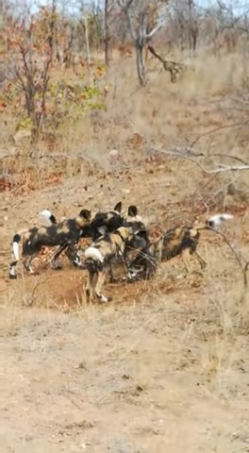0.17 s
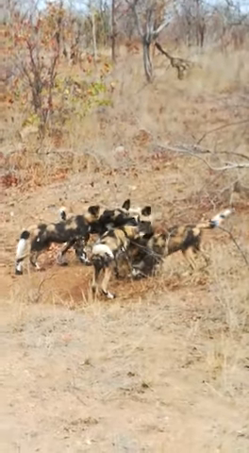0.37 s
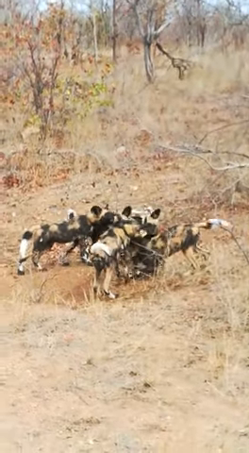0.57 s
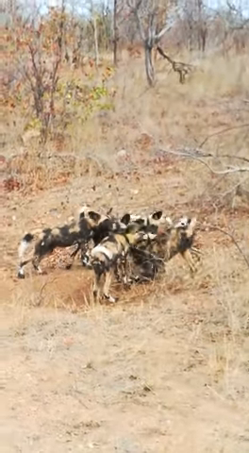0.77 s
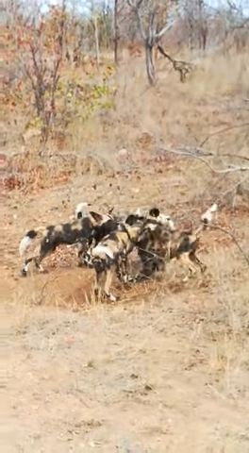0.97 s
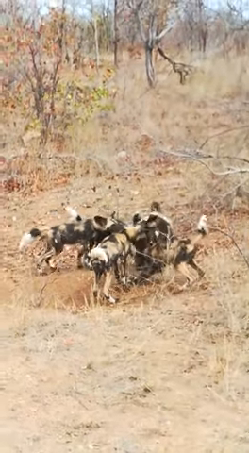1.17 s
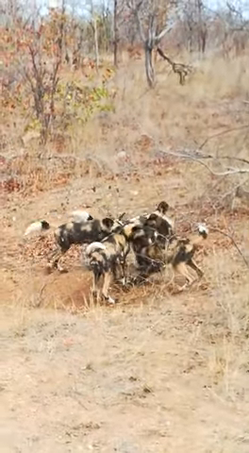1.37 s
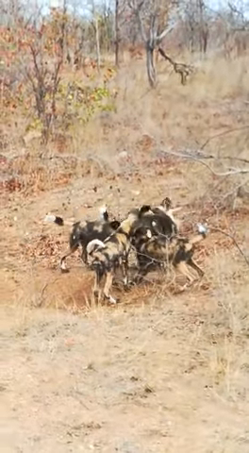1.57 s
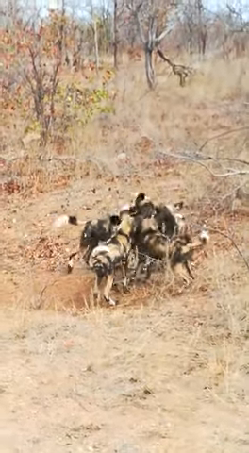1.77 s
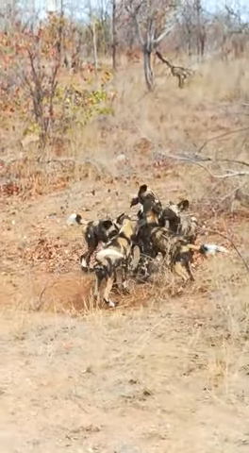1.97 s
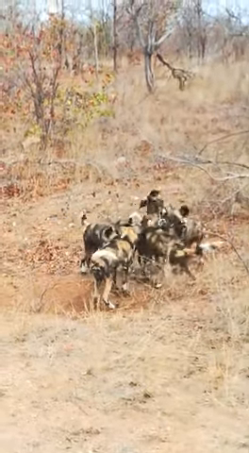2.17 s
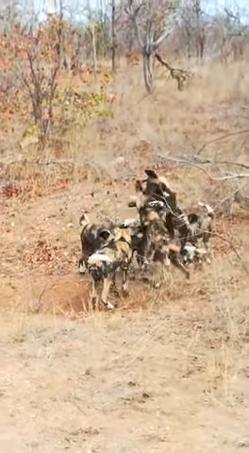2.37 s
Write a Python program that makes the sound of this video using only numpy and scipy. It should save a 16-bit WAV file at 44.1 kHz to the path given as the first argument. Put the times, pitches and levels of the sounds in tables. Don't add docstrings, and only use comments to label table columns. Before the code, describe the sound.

A pack of wild dogs twitters in short, piercing, birdlike chirps that swoop and waver, with brief soft whimpers and faint paw scuffs, in open dry scrub, while light wind thumps dully on a handheld phone's microphones.

```python
import sys
import numpy as np
from scipy import signal
from scipy.fft import rfft, irfft, next_fast_len
from scipy.io import wavfile
from scipy.ndimage import uniform_filter1d, map_coordinates

SR = 44100
rng = np.random.default_rng(int(sys.argv[2]) if len(sys.argv) > 2 else 0)


def level_to_linear(level):
    exponent = np.asarray(level, float) / 20
    return 10 ** exponent


def generate_wav(signal):
    frames = np.transpose(np.atleast_2d(signal))
    scaled = np.clip(frames, -1, 1) * 32767
    pcm = np.round(scaled).astype(np.int16)
    wavfile.write(sys.argv[1], SR, pcm)


N = 105840

# time_s, pitch_hz
T1 = [-68, -55, -65, -46.5, -54], [(.044, 6960), (.063, 7050), (.084, 6430), (.096, 6960), (.105, 7800)]
T2 = [-67, -54, -52, -45, -57, -55, -50], [(.183, 7830), (.2, 8360), (.245, 8260), (.287, 8910),
      (.318, 8500), (.345, 7490), (.372, 5970), (.392, 6930)]
T3 = [-49.5, -48.5, -61, -61, -48.5], [(.253, 7110), (.272, 7000), (.29, 6440), (.308, 5740), (.336, 7300)]
T4 = [-72.5, -60.5, -56.5, -57, -60.5], [(.51, 7600), (.545, 7430), (.58, 6200), (.6, 5450), (.613, 5880),
      (.622, 7000)]
T5 = [-55.5, -55.5, -62, -59, -66.5, -56.5, -51.5], [(.641, 8980), (.67, 9190), (.685, 10240),
      (.704, 11540), (.73, 10900), (.762, 10060), (.787, 7140), (.803, 5870), (.83, 7100)]
T6 = [-58, -63, -66.5], [(.815, 7660), (.835, 6890), (.852, 6050)]
T7 = [-58, -60, -65, -55, -69, -66], [(1.02, 14000), (1.036, 15200), (1.056, 13200), (1.072, 11700),
      (1.088, 10900), (1.105, 11500), (1.14, 11800)]
T8 = [-70, -64, -76, -64, -75, -61, -65], [(1.155, 11900), (1.187, 12160), (1.22, 10440), (1.238, 11800),
      (1.25, 11970), (1.262, 9300), (1.277, 6165), (1.303, 6320)]
T9 = [-61, -57, -65.5, -60.5], [(1.12, 7600), (1.15, 7350), (1.18, 6500), (1.205, 6110)]
T10 = [-63, -58.5], [(1.436, 7530), (1.447, 9030)]
T11 = [-67.5, -49, -51.5, -61, -57.5], [(1.537, 8580), (1.546, 8280), (1.551, 7600), (1.561, 7070),
       (1.575, 6910), (1.581, 6210), (1.594, 6710)]
T12 = [-61, -64.5, -67, -59, -55.5], [(1.69, 8020), (1.73, 7660), (1.742, 6900), (1.753, 8000)]
T13 = [-57, -47.5, -51.5, -48, -47.5, -59.5], [(1.808, 8670), (1.817, 8200), (1.823, 7600), (1.85, 7170),
       (1.866, 6900), (1.871, 6314), (1.889, 6430)]
T14 = [-76, -64.5, -53.5, -59], [(1.982, 6900), (1.997, 7570), (2.05, 7110), (2.057, 6460), (2.075, 6620)]
T15 = [-57, -45.5, -54.5, -54.5, -52], [(2.128, 7950), (2.143, 6960), (2.165, 6620), (2.171, 7170),
       (2.178, 6370), (2.195, 6410)]
T16 = [-57, -54.5, -60.5, -52, -62.5], [(2.278, 7650), (2.31, 6890), (2.35, 6374), (2.39, 6287),
       (2.405, 6350)]
T17 = [-63, -56], [(2.32, 6870), (2.352, 7500)]
T18 = [-57, -72], [(2.055, 8000), (2.07, 8300), (2.081, 9030)]
T19 = [-59, -58], [(1.746, 8500), (1.76, 8700)]
# (time_s, pitch_hz)
TWITTERS = [T1, T2, T3, T4, T5, T6, T7, T8, T9, T10, T11, T12, T13, T14, T15, T16, T17, T18, T19]
# frequency_hz, gain_db
THROAT = [(5600, -3.5), (6300, 13.5), (7600, 4), (8800, 6.5), (10200, -20.5), (11500, -3.5), (13000, -35),
          (15000, -7)]
# whimper_multiple, level_db
SIDEBANDS = [(-1, -19), (1, -6), (2, -22)]
# start_s, length_s, first_hz, middle_hz, last_hz, level_db
WHIMPERS = [
    (0.34, 0.082, 520, 469, 398, -74),
    (0.335, 0.022, 984, 985, 980, -70.5),
    (0.763, 0.025, 1060, 1002, 950, -70),
    (1.481, 0.024, 1048, 1015, 1030, -58),
    (1.505, .024, 1280, 1270, 1260, -65),
    (1.528, 0.039, 1260, 1203, 1000, -76),
    (1.778, 0.081, 891, 985, 894, -70),
    (2.102, 0.068, 897, 873, 800, -57.5),
    (2.31, 0.063, 736, 590, 469, -65.5),
]
# frequency_hz, gain_db
MUZZLE = [(1400, -30), (1800, -4.5), (2070, -4.5), (2750, -7.5), (3650, -6.5), (4400, -6.5), (5300, 0),
          (6200, 2.5)]
# time_s, frequency_hz, gain_db
JAWS = [
    (1.49, 2080, 9.5),
    (1.797, 3720, 24),
    (1.823, 2920, 21),
    (2.128, 3570, 14),
    (2.335, 2500, 13),
    (2.358, 2850, 20),
]
# time_s, length_s, level_db
SCUFFS = [(0.196, 0.0053, -72), (0.89, 0.004, -56), (0.984, 0.18, -65), (1.042, 0.0047, -50.5),
          (1.076, 0.04, -47.5), (1.145, 0.1, -60), (1.242, 0.068, -63), (1.437, 0.01, -69),
          (1.548, 0.0033, -53.5), (1.736, 0.012, -62.5), (1.89, 0.0073, -64), (2.072, 0.049, -52),
          (2.346, 0.11, -58)]
# frequency_hz, density_db (per Hz)
LITTER = [(530, -43), (900, -6.5), (1170, -14), (1950, -7.5), (3140, -4), (8440, 1), (12200, -26),
          (15500, -23)]
# time_s, level_db
MILLING = [
    (0.0, -74.5),
    (.62, -73.5),
    (.72, -64.5),
    (.9, -69),
    (1.72, -74.5),
    (1.82, -62.5),
    (1.9, -76.5),
    (1.96, -80),
    (2.4, -76),
]
# frequency_hz, density_db (per Hz)
STIR = [(3000, -14), (5000, -3), (6500, 3.5), (8500, -4), (10000, -48), (13000, -27)]
# frequency_hz, gain_db
SHADOW = [(60, 0.5), (400, -3.5), (1500, 5), (4400, -17), (6500, -29), (9000, -13.5), (15000, -40)]
# time_s, peak_db, snap_db
THUMPS = [(0.053, -40, -10), (0.109, -51, -9), (0.136, -36.5, 7), (.2, -30.5, -5), (.253, -18.5, -1.5),
          (.278, -19, -5), (0.319, -25.5, -14), (.435, -41.5, 5), (.519, -28.5, -1), (.568, -23.5, 3),
          (.612, -27.5, -11), (.64, -18.5, -0.5), (.687, -24, 2.5), (.759, -25, -5.5), (0.833, -27.5, -6),
          (0.863, -31.5, -3), (.901, -25, -15), (.912, -24, 0), (0.986, -37, -13), (1.038, -32, -21),
          (1.121, -26.5, -15.5), (1.138, -31, -16), (1.164, -38, -14), (1.215, -20.5, -3),
          (1.246, -29.5, -3), (1.263, -30.5, 3), (1.289, -32, -10), (1.338, -25.5, 2.5), (1.369, -24.5, 2),
          (1.379, -27, 3.5), (1.397, -35.5, -2), (1.429, -45, -10), (1.489, -43, -22), (1.565, -32.5, -12),
          (1.637, -25, -13), (1.812, -46, -14), (1.876, -40.5, -18), (1.995, -34.5, 1.5),
          (2.023, -32.5, -16), (2.079, -26, -5), (2.101, -22.5, -7.5)]
# frequency_hz, density_db (per Hz)
RUMBLE = [(8.8, -54), (15, -3), (70, -5), (120, -8.5), (226, -25), (500, -45.5), (650, -106), (1100, -120)]
# frequency_hz, density_db (per Hz)
BUSH = [(250, 2), (600, -4.5), (1000, -2.5), (3000, -4.5), (9000, -8.5), (15700, -18.5)]

WHISTLE_DB, FLUTTER_DB, PULSING_DB, OCTAVE_DB = 4, 2.5, 1.8, -45
WAVER_HZ, GLIDE_S, SPLIT_HZ = 34.9, 0.0058, 930
JAWS_WIDE_HZ, JAWS_S, PATCHY_DB, LATE_SAG = 350, 0.014, 3, 1.6
VOICE_EDGE_S = 0.0073
STIR_DB, BUSH_DB = 2.5, -67
SELF_ALIKE = 0.068
ECHO_DB, FAR_ECHO_DB, ECHO_T60_S, SCATTER, LOW_ECHO = -7, -8.5, 0.095, 1.2, 0.25
CALM_DB, DYING_DB, EDDY_S, STEADY_DB, LUMPS_DB = -44.5, -20, 0.034, -2.5, 4.5
THUMP_HZ, THUMP_T60_S, THUMP_DB, SNAP_DB = 85.2, 0.067, 2.5, -5.5
PASSING_DB, PASSING_HZ, PASSING_T60_S = -37.5, 80, 0.048
LAG_S, WHIMPER_LAG_S, WIND_LAG_S = 0.00068, 0.00036, 0.0011


def unit(x):
    return x / np.sqrt(np.mean(x ** 2) + 1e-20)


def along(points, hz):
    f, v = np.transpose(points)
    return np.interp(np.log(hz + 1), np.log(f + 1), v)


def curves(rows, smooth_s):
    s, *cols = np.transpose(rows)
    t = np.arange(N) / SR
    return [uniform_filter1d(np.interp(t, s, c), int(smooth_s * SR) + 1) for c in cols]


def wobble(rate):
    knots = rng.standard_normal(int(N * rate / SR) + 4)
    return map_coordinates(knots, [np.arange(N) * rate / SR])


def filtered(x, response):
    m = next_fast_len(N + SR // 2)
    return irfft(rfft(x, m) * response(np.fft.rfftfreq(m, 1 / SR)), m)[..., :N]


def noise(spectrum):
    return unit(filtered(rng.standard_normal(N), lambda hz: level_to_linear(along(spectrum, hz))))


def gate(start, end, edge_s):
    t = np.arange(N) / SR
    opening = np.minimum(t - start, end - t) / edge_s + 0.5
    return np.sin(np.pi / 2 * np.clip(opening, 0, 1)) ** 2


def twitters(low_phase, low_on):
    out, t = np.zeros(N), np.arange(N) / SR
    for effort_db, glide in TWITTERS:
        hz, = curves(glide, GLIDE_S)
        start, end = glide[0][0], glide[-1][0]
        phase = 2 * np.pi * np.cumsum(hz + WAVER_HZ * wobble(300)) / SR
        octave = level_to_linear(OCTAVE_DB + 2.6 * wobble(37.0)) * (hz < SR / 5) * np.sin(2 * phase)
        tone = level_to_linear(along(THROAT, hz)) * (np.sin(phase) + octave)
        for multiple, side_db in SIDEBANDS:
            k = int(multiple)
            side = level_to_linear(side_db + along(THROAT, hz + k * SPLIT_HZ))
            tone = tone + low_on * side * np.sin(phase + k * low_phase)
        db = np.interp(t, np.linspace(start, end, len(effort_db)), effort_db)
        db = db + FLUTTER_DB * (1 + (hz > 9500)) * wobble(110)
        db = db + PULSING_DB * wobble(280)
        out += level_to_linear(db + WHISTLE_DB) * gate(start, end, VOICE_EDGE_S) * tone
    return out


def jaws_db(hz, start, end):
    t, gain = np.arange(N) / SR, 0
    for at, centre_hz, peak_db in JAWS:
        if start < at < end:
            distance = ((hz - centre_hz) / JAWS_WIDE_HZ) ** 2 + ((t - at) / JAWS_S) ** 2
            gain = gain + peak_db * np.exp(-distance)
    return gain


def whimpers():
    out, low_phase, low_on = np.zeros(N), np.zeros(N), np.zeros(N)
    t = np.arange(N) / SR
    for start, length, first_hz, mid_hz, last_hz, db in WHIMPERS:
        u = np.clip((t - start) / length, 0, 1)
        v = u ** LATE_SAG if first_hz > 800 else u
        arch_hz = (mid_hz - (first_hz + last_hz) / 2) * 4 * v * (1 - v)
        hz = first_hz + (last_hz - first_hz) * v + arch_hz + 6 * wobble(60)
        phase = 2 * np.pi * np.cumsum(hz) / SR
        envelope = gate(start, start + length, VOICE_EDGE_S)
        overtones = 0
        for k in range(2, 7):
            over_db = along(MUZZLE, k * hz) + jaws_db(k * hz, start, start + length)
            over_db = over_db + PATCHY_DB * (wobble(60) - 1.0) - 8.8 * u ** 2
            overtones = overtones + level_to_linear(over_db) * np.sin(k * phase)
        level = level_to_linear(db + 6 + 3.33 * wobble(50))
        out += level * envelope * (np.sin(phase) + overtones * 0.48)
        if 800 < first_hz < 1200 and length > 0.025:
            low_phase = np.where(envelope > 0, phase, low_phase)
            depth = envelope * level_to_linear(-14 * np.clip(2 * u - 1, 0, 1) ** 2)
            low_on = np.maximum(depth, low_on)
    return out, low_phase, low_on


def scuffs():
    t = np.arange(N) / SR
    milling_db, = curves(MILLING, 0.063)
    swell = sum(level_to_linear(db) * np.exp(-(2 * (t - s) / length) ** 2) for s, length, db in SCUFFS)
    litter = unit(level_to_linear(3.4 * wobble(300)) * noise(LITTER))
    stir = level_to_linear(milling_db + STIR_DB + 3.3 * wobble(25.33)) * noise(STIR)
    return swell * litter + stir


def echo(x):
    t = np.arange(SR // 4) / SR
    tail = rng.standard_normal((2, len(t))) * level_to_linear(-60 * t / ECHO_T60_S) * (t > 0.004)
    tail = tail / np.linalg.norm(tail[0]) * level_to_linear([[ECHO_DB], [ECHO_DB + FAR_ECHO_DB]])
    scattered = x * unit(1 + SCATTER * wobble(500))
    return signal.fftconvolve(scattered[None], tail, axes=1)[:, :N]


def wind():
    clock = np.arange(0, N, 32) / SR
    swell = level_to_linear(CALM_DB + DYING_DB * (clock * SR / N) ** 2)
    for s, peak_db, _ in THUMPS:
        gust = np.exp(-((clock - s - 0.02) / EDDY_S) ** 2)
        swell = swell + level_to_linear(peak_db + STEADY_DB - 12.5) * gust
    rumble = unit(level_to_linear(LUMPS_DB * wobble(22.266)) * noise(RUMBLE))
    out = np.pad(np.repeat(swell, 32)[:N] * rumble, (0, SR))
    t = np.arange(SR // 8) / SR
    draws = rng.standard_normal((len(THUMPS), 3))
    for (s, peak_db, snap_db), (a, b, c) in zip(THUMPS, draws):
        turn = 2 * np.pi * THUMP_HZ * np.exp(0.11 * a) * t * (1 - 5.4 * t)
        rise = 1 - np.exp(-(t / 0.0035) ** 2)
        body = level_to_linear(-60 * t / THUMP_T60_S) * rise * np.sin(turn + 0.11 * b)
        snap_hz = 170 * np.exp(0.23 * c)
        snap = np.exp(-((t - 0.005) / 0.0022) ** 2) * np.cos(2 * np.pi * snap_hz * (t - 0.005))
        hit = body + level_to_linear(SNAP_DB + snap_db) * snap
        out[round(s * SR):][:len(t)] -= level_to_linear(peak_db + THUMP_DB) * hit
    return filtered(out[:N], lambda hz: hz / (hz + 12) / (1 + (hz / 520) ** 6))


def passing():
    t = np.arange(N) / SR
    return -level_to_linear(PASSING_DB - 60 * t / PASSING_T60_S) * np.cos(2 * np.pi * PASSING_HZ * t)


def bush():
    shared = noise(BUSH)
    own = np.array([noise(BUSH) for _ in range(2)])
    pair = np.sqrt(SELF_ALIKE) * shared + np.sqrt(1 - SELF_ALIKE) * own
    return level_to_linear(BUSH_DB + 0.09 * wobble(7.24)) * pair


def shaded(x, lag_s):
    return filtered(x, lambda hz: level_to_linear(along(SHADOW, hz)) * np.exp(-2j * np.pi * hz * lag_s))


def scene():
    low, low_phase, low_on = whimpers()
    high = twitters(low_phase, low_on) + scuffs()
    pack, gusts, air = low + high, wind(), bush()
    near = pack + gusts + air[0]
    far = shaded(high, LAG_S) + shaded(low, WHIMPER_LAG_S) + shaded(gusts, WIND_LAG_S)
    far = far + np.roll(air[1], round(LAG_S * SR))
    return np.array([near, far]) + passing() + echo(pack - (1 - LOW_ECHO) * low)


def band_limit(x):
    return signal.sosfilt(signal.butter(12, 15990, fs=SR, output="sos"), x)


def record(dry):
    mix = filtered(dry, lambda hz: hz < 15750)
    return band_limit(mix)


dry = scene()
out = record(dry)
generate_wav(out)
```